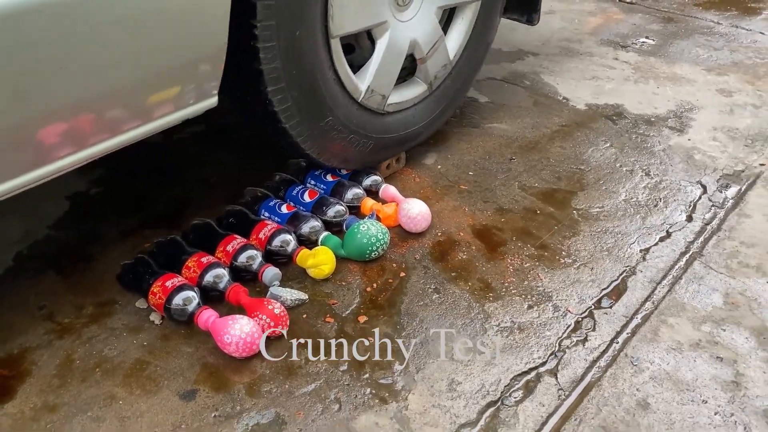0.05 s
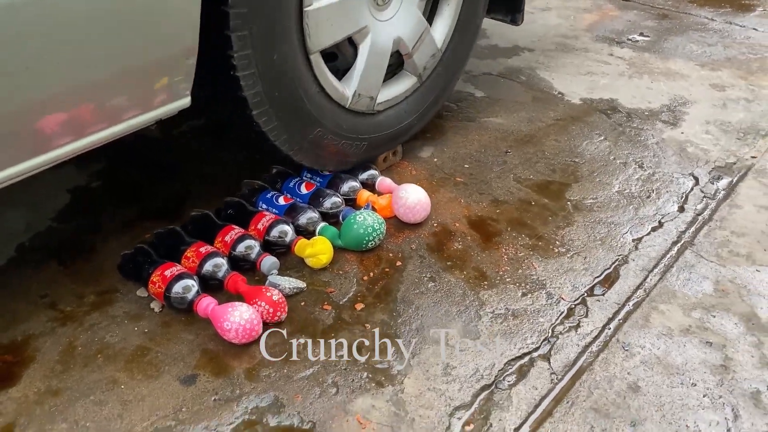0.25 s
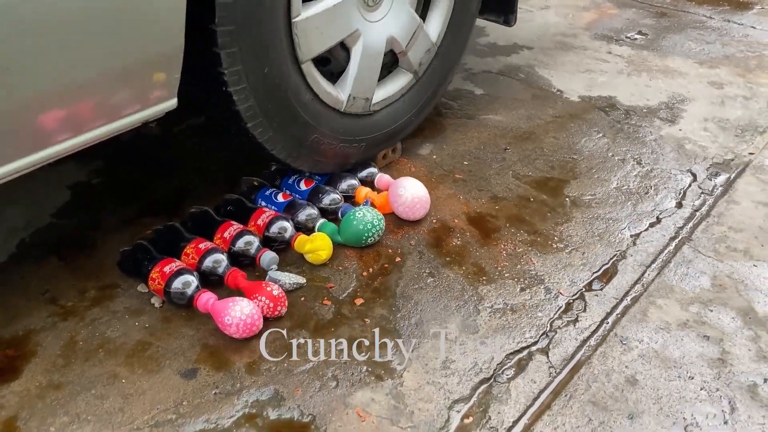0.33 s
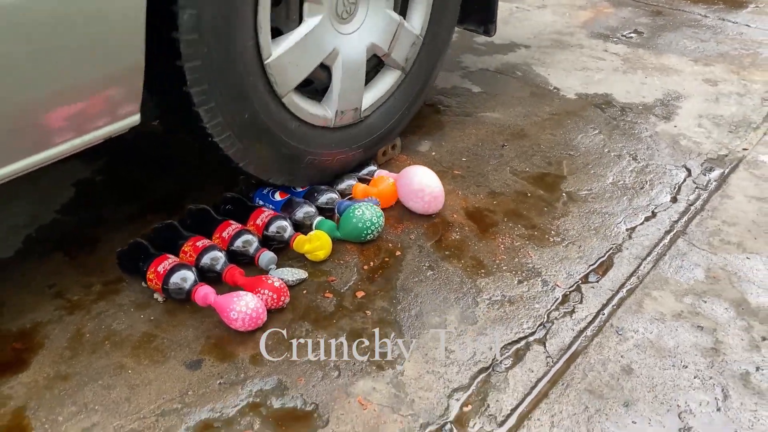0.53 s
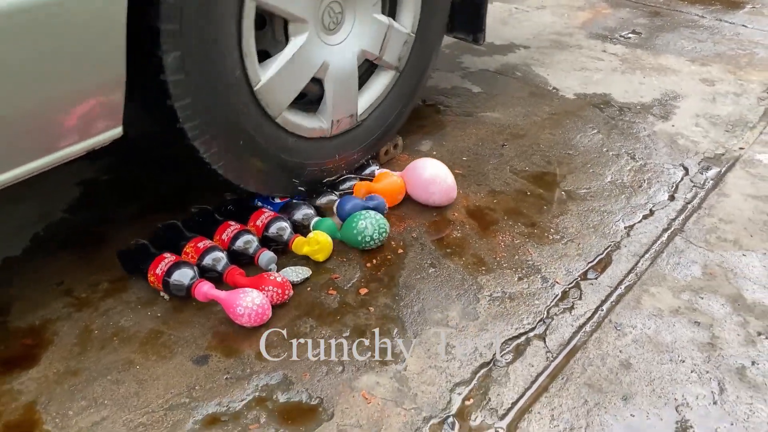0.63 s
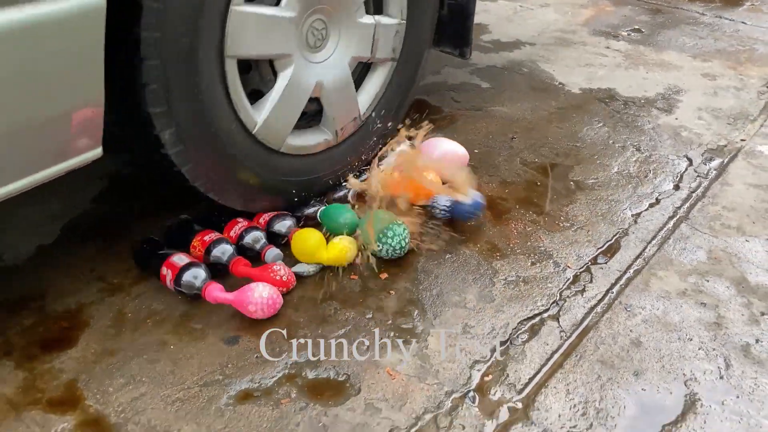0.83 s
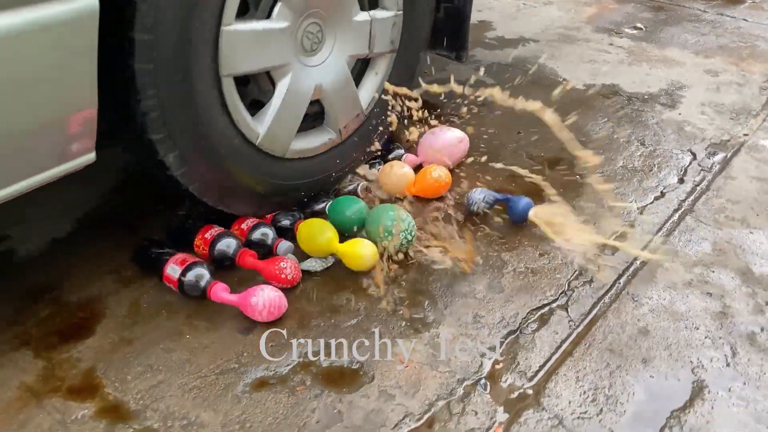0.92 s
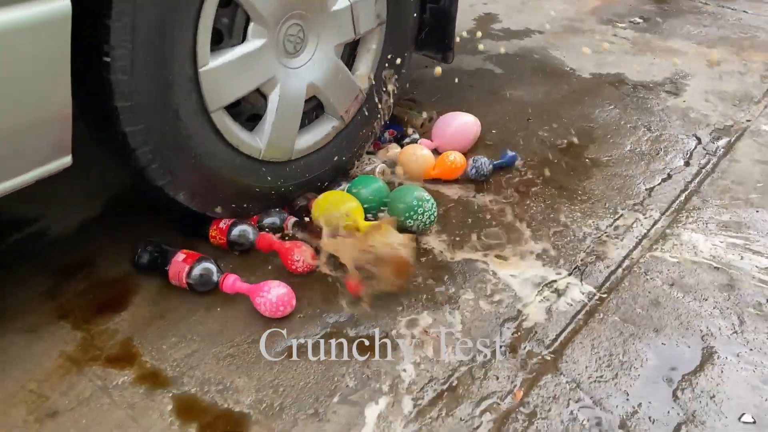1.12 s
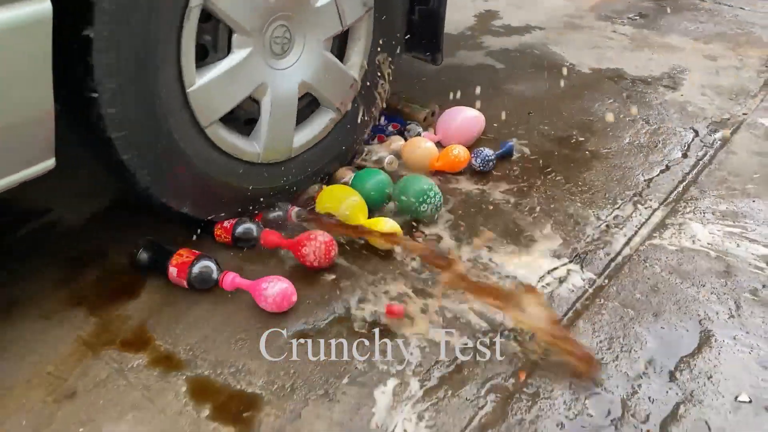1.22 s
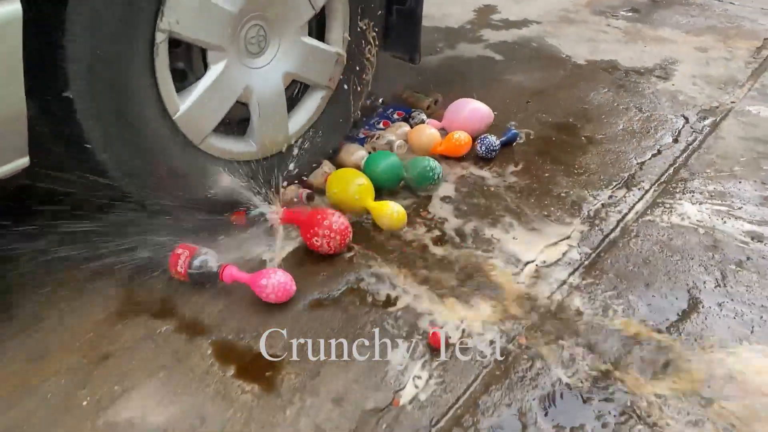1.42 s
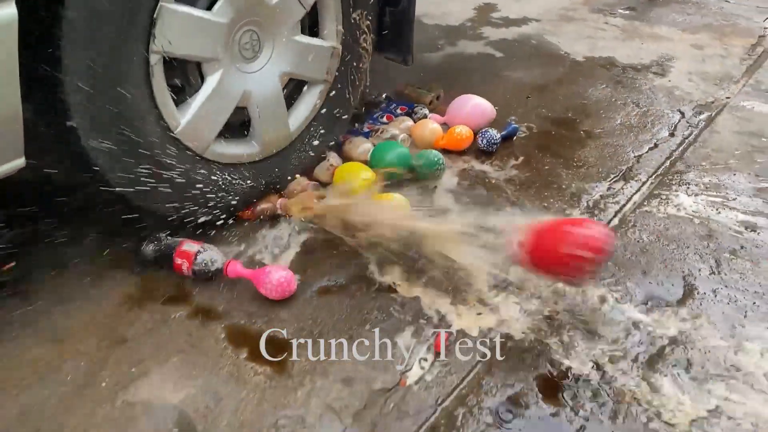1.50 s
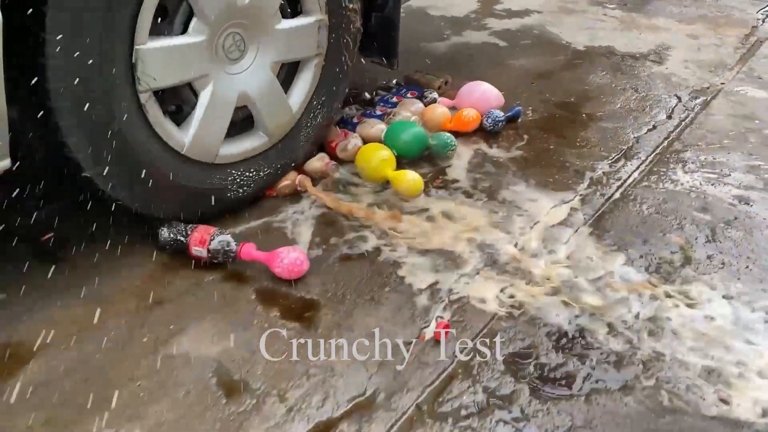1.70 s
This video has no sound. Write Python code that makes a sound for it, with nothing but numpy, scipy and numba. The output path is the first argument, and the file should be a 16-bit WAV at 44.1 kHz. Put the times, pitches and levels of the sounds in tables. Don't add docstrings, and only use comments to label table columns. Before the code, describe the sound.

Plastic bottles crack and pop under a slow car tyre, after a squeal of rubber

```python
import sys
import numpy as np
from scipy import signal
from scipy.fft import rfft, irfft
from scipy.io import wavfile
from scipy.ndimage import uniform_filter1d, minimum_filter1d
from numba import njit

SR = 44100
rng = np.random.default_rng(int(sys.argv[2]) if len(sys.argv) > 2 else 0)


def gain_from_db(level_db):
    decades = np.asarray(level_db, float) / 20
    return 10 ** decades


def generate_wav(signal):
    frames = np.transpose(np.atleast_2d(signal))
    scaled = np.clip(frames, -1, 1) * 32767
    pcm = np.round(scaled).astype(np.int16)
    wavfile.write(sys.argv[1], SR, pcm)


N = 77175
T = np.arange(N) / SR
START_S = .1368

# time in seconds, pitch in Hz, level in dB, creak
# in dB re level.
SQUEAL_PATH = [
    (.137, 5353, -27.5, -14.5),
    (.156, 5370, -29, -11),
    (.163, 5274, -39, -1),
    (.192, 5195, -39, 2.5),
               (.2, 5137, -32, -6),
    (0.234, 5205, -27.5, -7.5),
    (0.267, 5040, -26.5, -6.5),
    (.306, 4957, -27, -7.5),
    (.34, 4780, -22.5, -12.5),
    (.352, 4850, -25, -11),
    (0.389, 4890, -21.5, -15),
    (.432, 5460, -26.5, -10),
    (.458, 5436, -40, 3),
]
# time in seconds, pitch in Hz, level in dB.
STRAND_PATH = [
    (.2, 5450, -38),
    (.232, 5420, -31),
    (.28, 5200, -40),
    (.32, 5240, -26.5),
    (.35, 5150, -30),
    (.37, 5130, -43),
]
# start in seconds, peak in dB, ring in Hz, treble in dB re peak, t60 in seconds.
WALL_CRACKS = [
    (0.4908, -5, 1930, -4, 0.012),
    (0.7136, -2, 1760, 3.5, 0.012),
    (0.8553, -2, 2530, 4, 0.011),
    (1.0438, -11, 2230, -6, 0.0093),
    (1.0658, -6, 2460, 0, 0.0087),
    (1.1711, -2.5, 4000, -15, 0.0056),
    (1.5817, -16.5, 3600, -13, 0.0063),
    (1.7091, -13.5, 3830, -4, 0.0055),
    (1.7454, -15, 3400, -5, 0.021),
]
# start in
# seconds, peak in dB, ring in Hz, treble in dB re peak, t60 in seconds.
FURTHER_CRACKS = [(.435, -13.5, 2500, -28, 0.044), (.6802, -17, 2260, -20, 0.0063),
                  (.745, -14.5, 1750, -18, 0.013), (.807, -14.5, 1240, -12, 0.012),
                  (.9885, -25.5, 1800, 8, 0.015), (1.1282, -21.5, 6500, -11, 0.034),
                  (1.142, -22, 4230, -8, 0.011), (1.159, -14, 3040, -25, 0.018), (1.285, -21, 4970, -2, 0.012),
                  (1.366, -23.5, 1480, -10, 0.019), (1.504, -24, 2000, 5, 0.0041),
                  (1.519, -28.5, 3000, 5, 0.062), (1.6675, -31.5, 1500, -22, 0.0083),
                  (0.2521, -17.5, 2300, 4.5, 0.0062), (0.291, -16, 2300, -10, 0.0046),
                  (0.5807, -10, 2160, -5.5, 0.016), (0.9104, -10, 2360, -12, 0.0049),
                  (1.2516, -7.5, 2270, -10, 0.02), (1.3981, -19, 1600, -15, 0.0076),
                  (1.4578, -10, 1770, -13, 0.013), (1.4724, -11.5, 3780, 4.5, 0.0069),
                  (.882, -20, 2300, -11, 0.0068), (1.036, -30, 2100, -16, 0.0071),
                  (1.534, -26, 2500, -2, 0.0068), (1.465, -15, 2500, -10, .008)]
# start in seconds, peak in dB, pitch in Hz, t60 in seconds.
PANEL_MODES = [(.2523, -18.5, 2210, 0.0073), (.2523, -19, 7360, .006), (.2913, -11, 1850, 0.0062),
               (.2913, -8.5, 2570, 0.008), (.4911, -10.5, 1930, 0.006), (.4911, -15, 5110, 0.0052),
               (.4911, -18, 7580, 0.0063), (.581, -15.5, 1350, 0.0089), (.581, -18, 2630, 0.0066),
               (.581, -25, 4060, 0.0051), (.6805, -25.5, 3160, 0.0043), (.7139, -12, 3780, 0.012),
               (.7139, -16, 1633, 0.012), (.8556, -12, 1650, .008), (.8556, -11, 2200, 0.0067),
               (.8556, -12.5, 2784, 0.0062), (.8556, -15, 4160, 0.0044), (.8556, -18, 9380, 0.0048),
               (.8556, -15, 12150, 0.0066), (1.0441, -14.5, 1480, 0.0061), (1.0441, -18.5, 2800, 0.0086),
               (1.0441, -19.5, 4620, .007), (1.0661, -10, 1720, 0.0042), (1.0661, -13.5, 3880, 0.0039),
               (1.0661, -22, 5570, 0.0049), (1.068, -22.5, 743, 0.022), (1.1715, -15, 970, 0.02),
               (1.2518, -13, 2240, 0.021), (1.2518, -22.5, 3580, 0.01), (1.2518, -19.5, 8100, .008),
               (1.398, -19, 1600, .006), (1.398, -23.5, 810, 0.011), (1.7093, -19.5, 3940, 0.0048),
               (1.7093, -25, 8840, 0.0054)]
# start in seconds, peak in dB, pitch in Hz, t60 in seconds.
BOTTLE_THUMPS = [(0.6093, -13.5, 307, 0.022), (.6097, -17.5, 186, 0.041), (.629, -25, 915, 0.04),
                 (.7138, -12, 736.5, 0.073), (0.714, -14.5, 1063, 0.045), (.788, -21, 424, 0.036),
                 (.806, -17.5, 616, 0.018), (.856, -20.5, 464, 0.027), (1.0439, -10, 450, 0.017),
                 (1.164, -20.5, 940, 0.04), (1.1712, -12, 587, 0.047), (1.2518, -19, 453, 0.064),
                 (1.2525, -16.5, 713, 0.041), (1.255, -21.5, 185, 0.12), (1.364, -27.5, 402, 0.025),
                 (1.4621, -7, 396, 0.034), (1.474, -11.5, 450, 0.045), (1.666, -25.5, 500, 0.047),
                 (1.718, -22.5, 487, 0.032), (1.746, -17, 940, .025), (1.44, -21, 324, .025),
                 (1.447, -20, 487, .025), (1.547, -26.5, 553, 0.024), (1.518, -26, 600, 0.012),
                 (1.581, -27, 445, .02), (1.625, -31.5, 397, .03), (.843, -26, 470, .03),
                 (.796, -23, 405, 0.033), (1.747, -16, 223, .03), (1.709, -24, 520, .015)]
# start in seconds, peak in dB,
# pitch in Hz.
LOW_PUSHES = [
    (0.6108, -13, 280),
    (0.804, -21.5, 92),
    (0.9, -26, 64),
    (1.457, -18, 130),
]
# time in seconds, crunch level in dB, spray level in dB.
TYRE_LOAD = [(.137, -48.5, -54), (.2, -41, -51), (.43, -40, -42), (.52, -36.5, -44), (.62, -35, -47),
             (.69, -37.5, -54.5), (.78, -33.5, -44), (1., -34.5, -51.5), (1.11, -40, -50), (1.2, -30, -51),
             (1.3, -37.5, -44.5), (1.44, -40, -48), (1.535, -37, -44), (1.57, -41.5, -60),
             (1.75, -49, -54.5)]
# frequency in Hz, level in dB per Hz.
CRUNCH_TONE = [(90, -36), (170, -5), (720, 0), (1100, -2), (2760, -7.5), (4600, -13.5), (9000, -25),
               (16000, -34)]
# frequency in Hz, level in dB per Hz.
SPRAY_TONE = [(2000, -3), (5000, 8.5), (10000, 2.5), (16000, -0.5)]
# time in seconds, nozzle pitch in Hz, level in dB, hiss in dB re level.
JET_PATH = [
    (1.115, 5960, -57, -4),
    (1.128, 6500, -33, -6),
    (1.156, 5000, -51, -7),
    (1.178, 4970, -22.5, -2),
    (1.198, 5350, -12, -2),
    (1.214, 6220, -6.5, -7),
    (1.233, 5800, -19, 3),
    (1.24, 5880, -30, -6),
    (1.3, 5460, -45.5, -7),
]
# frequency in Hz, level in dB per Hz.
HISS_TONE = [(500, -48), (900, -9), (3400, -10), (5500, -6), (7400, -10.5), (9500, -6.5), (16500, -25)]
# frequency in Hz, level in dB rms.
ENGINE_HUM = [(50, -51), (126, -50), (178, -44)]
# frequency in Hz, level in dB per Hz.
WIND_TONE = [(4, -18), (8, 6), (16, 6.5), (33, -13), (110, -14), (300, -16), (450, -35)]
# time in seconds, lift in dB.
WIND_GUSTS = [
    (.9, 1.5),
    (1., 10),
    (1.15, -1),
    (1.4, 7.5),
    (1.75, 4.5),
]


def level(x, db):
    return x * gain_from_db(db) / np.sqrt(np.mean(x ** 2))


@njit
def svf(x, hz, width):
    out, band_state, low_state = np.empty(len(x)), 0., 0.
    for i in range(len(x)):
        g, damping = np.tan(np.pi * hz[i] / SR), width / hz[i]
        v = (band_state + g * (x[i] - low_state)) / (1 + g * (g + damping))
        band_state, low_state = 2 * v - band_state, low_state + 2 * g * v
        out[i] = damping * v
    return out


def band(x, hz, width):
    return svf(x, np.clip(hz + np.zeros(len(x)), 20, .45 * SR), 1. * width)


def colour(x, points):
    hz, db = np.array(points).T
    f = np.maximum(np.fft.rfftfreq(len(x), 1 / SR), 1)
    gain = gain_from_db(np.interp(np.log(f), np.log(hz), db, -90, -90))
    return level(irfft(rfft(x) * gain, len(x)), 0)


def walk(rate):
    k = int(SR / rate)
    steps = np.repeat(rng.standard_normal(N // k + 1), k)
    return 1.9 * uniform_filter1d(uniform_filter1d(steps, k), k)[:N]


def curve(table, column, outside=None):
    p = np.array(table)
    return np.interp(T, p[:, 0], p[:, column], outside, outside)


def phase(hz):
    return 2 * np.pi * np.cumsum(hz) / SR


def add(out, x, s):
    i = int(s * SR)
    out[i:i + len(x)] += x[:N - i]


def narrow(x, hz, width):
    return level(band(band(x, hz, width), hz, 2 * width), 0)


def squeal():
    effort = SQUEAL_PATH
    hz, n = curve(effort, 1), rng.standard_normal((5, N))
    turn = phase(hz * (1 + 0.00885 * walk(350)))
    tone = gain_from_db(2.3 * walk(250)) * (np.sin(turn) + gain_from_db(-19) * np.sin(2 * turn))
    fuzz = narrow(n[0], hz, 750)

    half_on = np.clip(np.minimum(T - 0.327, 0.425 - T) / 0.011, 0, 1)
    half = narrow(n[1], hz / 1.96, 97) + .7 * np.sin(turn / 1.96) + 0.29 * np.sin(turn / 1.43)

    creak_gain = gain_from_db(curve(effort, 3))
    creak = narrow(n[2], 1574 - 1100 * (T - .3), 370)
    whistle_on = np.clip((0.294 - T) * 50, 0, 1)
    whistle = whistle_on * narrow(n[3], 6680, 274)
    air = level(band(n[4], 0.88 * hz, 3600), -7.5)

    mix = gain_from_db(-0.5) * tone + gain_from_db(-3.5) * fuzz + gain_from_db(-8.5) * half_on * half
    mix += creak_gain * (creak + gain_from_db(-2.5) * whistle) + air
    return gain_from_db(curve(effort, 2, -90)) * mix


def strand():
    turn = phase(curve(STRAND_PATH, 1) * (1 + 0.0119 * walk(300)))
    return gain_from_db(curve(STRAND_PATH, 2, -90) + 1.5 + 2.5 * walk(201)) * np.sin(turn)


def cracks(rows):
    out, t = np.zeros(N), T[:SR // 8]
    rise = np.minimum(t / 0.00048, 1)
    for s, db, hz, treble_db, t60 in rows:
        noise = rng.standard_normal((2, len(t)))
        noise[:, 12] = 3.1
        fall = np.log(1000) * t / max(t60, .003)
        burst, rattle = np.exp(-(fall / 1.33) ** 2), np.exp(-fall / 10.4)
        ring = noise[0] * rise * (burst + gain_from_db(-11.5) * rattle)
        ring = band(band(ring, hz, .8 * hz), hz, 1.3 * hz)
        snap = noise[1] * rise * (burst + gain_from_db(-15.5) * rattle)
        snap = band(band(snap, 5960, 12000), 6700, 25000)
        both = ring / np.abs(ring).max() + gain_from_db(treble_db) * snap / np.abs(snap).max()
        add(out, gain_from_db(db - 2.5) * both, s)
    return out


def rings():
    out, t = np.zeros(N), T[:SR // 16]
    for s, db, hz, t60 in PANEL_MODES:
        fall = np.exp(-np.log(1000) * t / max(1.6 * t60, .003)) * (1 - np.exp(-t / 0.00017))
        rough = 0.42 * level(band(rng.standard_normal(len(t)), hz, 0.37 * hz), -2)
        add(out, gain_from_db(db) * fall / fall.max() * (np.sin(2 * np.pi * hz * t) + rough), s)
    return out


def thumps():
    out, t = np.zeros(N), T[:SR // 8]
    for s, db, hz, t60 in BOTTLE_THUMPS:
        fall = np.exp(-np.log(1000) * t / max(t60, .005)) * (1 - np.exp(-t * hz / 0.83))
        rough = level(band(rng.standard_normal(len(t)), 1.02 * hz, 1.24 * hz), -7)
        add(out, gain_from_db(db - 2.5) * fall / fall.max() * (np.sin(2 * np.pi * hz * t) + rough), s)
    return out


def pushes():
    out, t = np.zeros(N), T[:SR // 8]
    for s, db, hz in LOW_PUSHES:
        add(out, -gain_from_db(db) * np.sin(2 * np.pi * hz * t) * np.exp(-1.6 * hz * t), s)
    return out


def jet():
    n, hz = rng.standard_normal((3, N)), curve(JET_PATH, 1) * (1 + 0.034 * walk(120))
    nozzle = level(band(band(n[0], hz, 570), hz, 2000), 3) * gain_from_db(2.0 * walk(300))
    second = level(band(band(n[2], 4650, 760), 4650, 1600), -1.5) * gain_from_db(2.2 * walk(150))
    air = gain_from_db(0.5 + curve(JET_PATH, 3) + 1.4 * walk(300)) * colour(n[1], HISS_TONE)
    return gain_from_db(curve(JET_PATH, 2, -90) - 3) * (air + nozzle + second)


def grains(rate, spread_db, smear_hz):
    hits = (rng.random(N) < rate / SR) * gain_from_db(spread_db * rng.exponential(size=N))
    pole = np.exp(-2 * np.pi * smear_hz / SR)
    return rng.standard_normal(N) * (1 + signal.lfilter([1], [1, -pole], hits))


def tyre():
    bed = colour(grains(150, spread_db=2.5, smear_hz=97), CRUNCH_TONE)
    low = signal.sosfilt(signal.butter(2, 900, fs=SR, output="sos"), bed)
    swelling = low * gain_from_db(1.6 * walk(35)) + (bed - low) * gain_from_db(1.4 * walk(25))
    crunch = swelling * gain_from_db(curve(TYRE_LOAD, 1) + 3)
    drops = colour(grains(60, spread_db=.6, smear_hz=110), SPRAY_TONE)
    spray = drops * gain_from_db(curve(TYRE_LOAD, 2) + 4 + 1.1 * walk(25.5))
    return crunch + spray


def engine():
    hum = np.zeros(N)
    for hz, db in ENGINE_HUM:
        hum += gain_from_db(db + 3 + 1.5 * walk(40)) * np.sin(phase(hz * (1 + .045 * walk(40))))
    return hum


def wind():
    return colour(rng.standard_normal(N), WIND_TONE) * gain_from_db(-38 + curve(WIND_GUSTS, 1) + 1.83 * walk(6.24))


def scene():
    bed = squeal() + jet() + tyre() + engine() + wind()
    bed += thumps() + pushes() + cracks(FURTHER_CRACKS) + rings() + strand()
    steady = signal.sosfilt(signal.ellip(8, .2, 60, 15900, fs=SR, output="sos"), bed)
    return ((cracks(WALL_CRACKS) + steady) * (T > START_S))[None]


def top_cut(x):
    return signal.sosfilt(signal.butter(12, 16840, fs=SR, output="sos"), x)


def record(dry):
    x = signal.sosfilt(signal.ellip(8, .2, 70, 16600, fs=SR, output="sos"), dry)
    limit = .78
    gain = minimum_filter1d(limit / np.maximum(np.abs(x), limit), size=89)
    mix = x * uniform_filter1d(gain, size=45)
    return top_cut(mix)


dry = scene()
out = record(dry)
generate_wav(out)
```